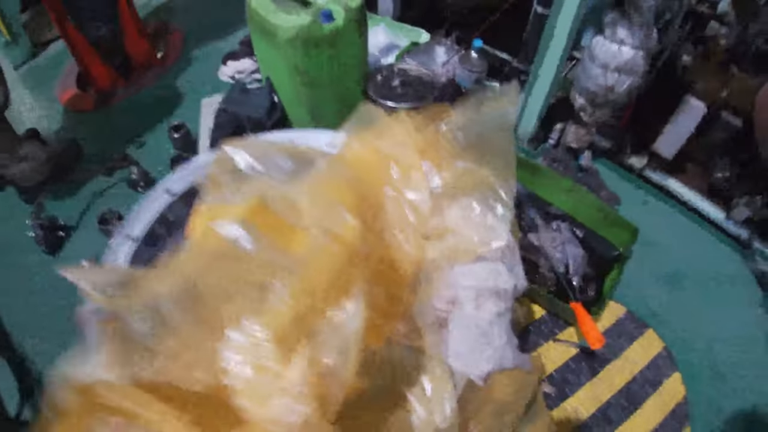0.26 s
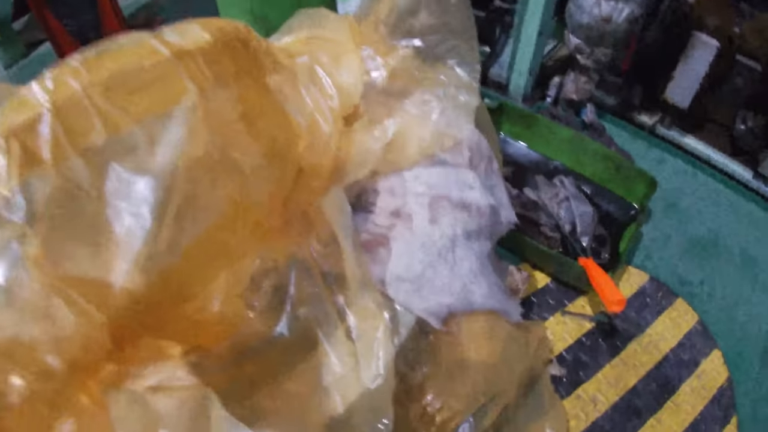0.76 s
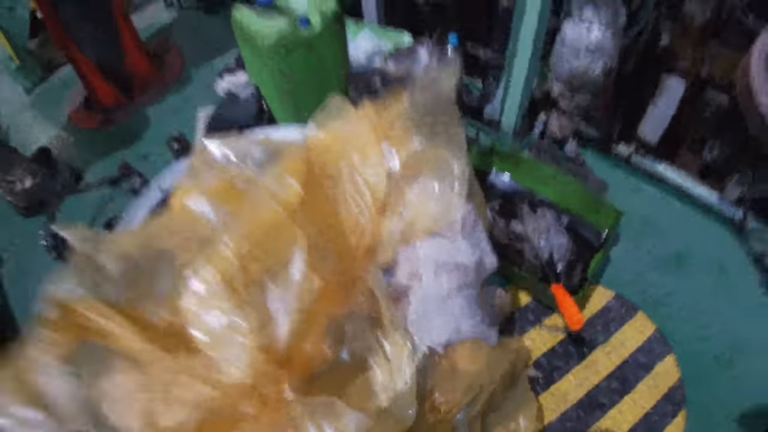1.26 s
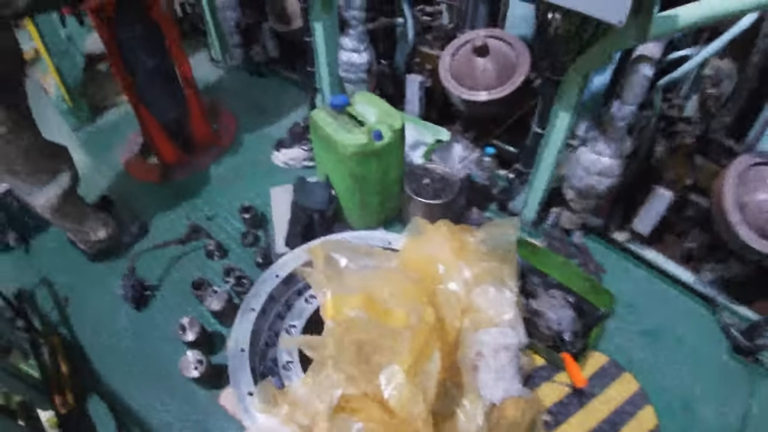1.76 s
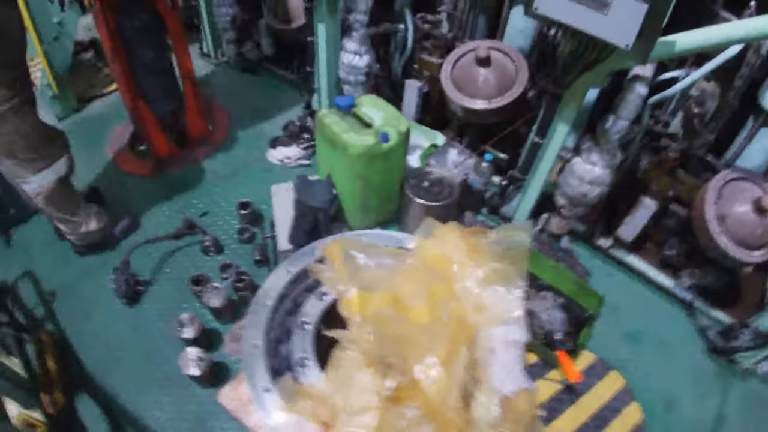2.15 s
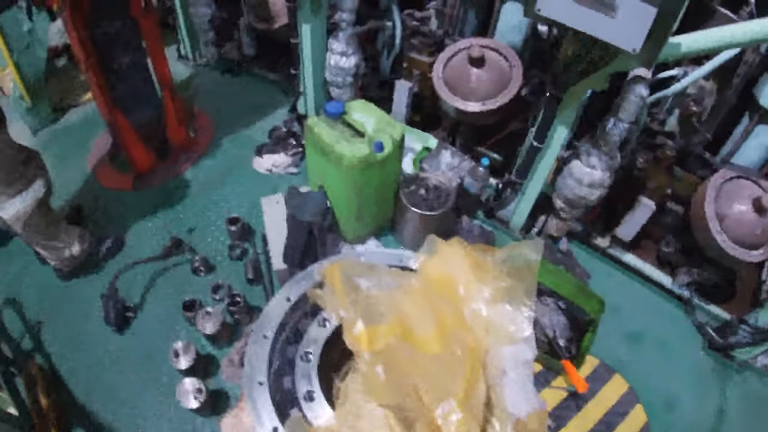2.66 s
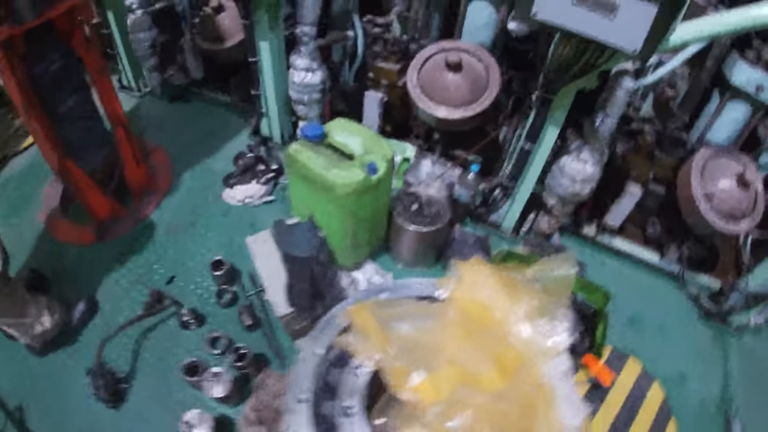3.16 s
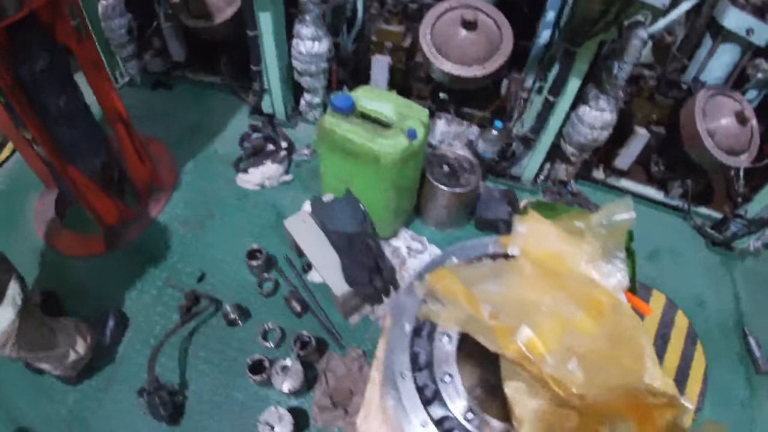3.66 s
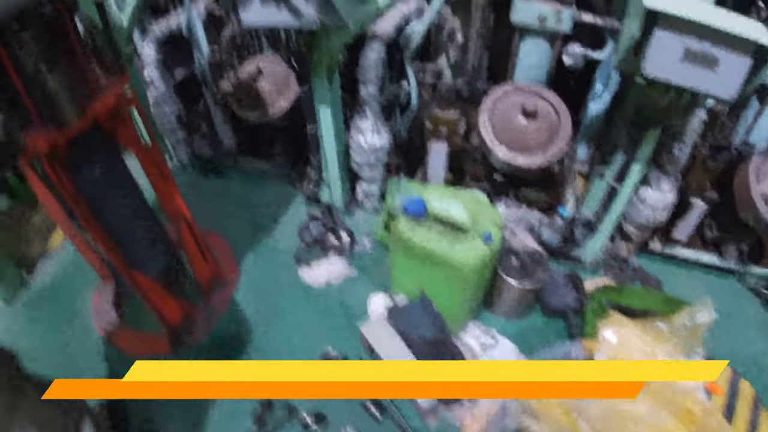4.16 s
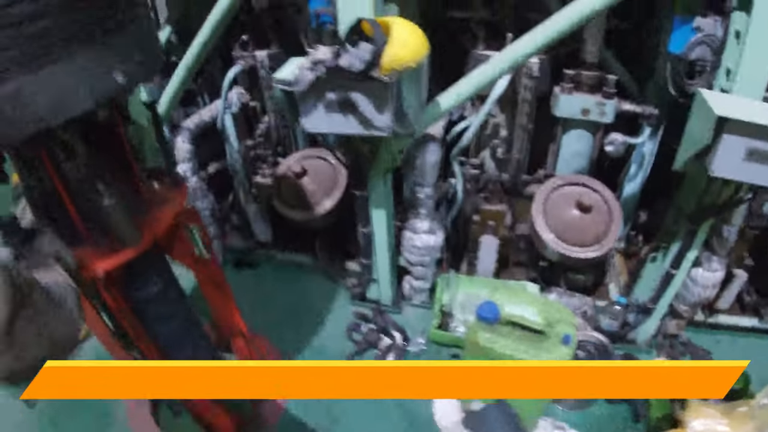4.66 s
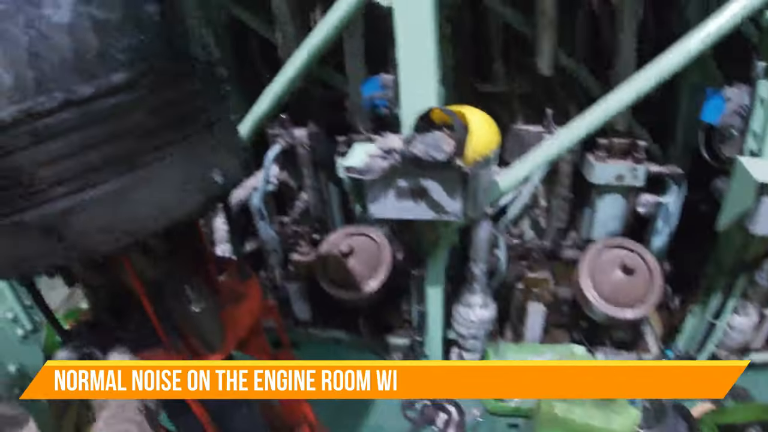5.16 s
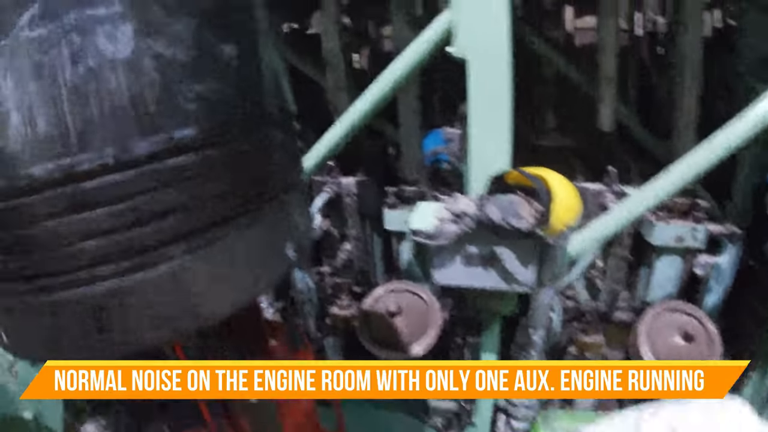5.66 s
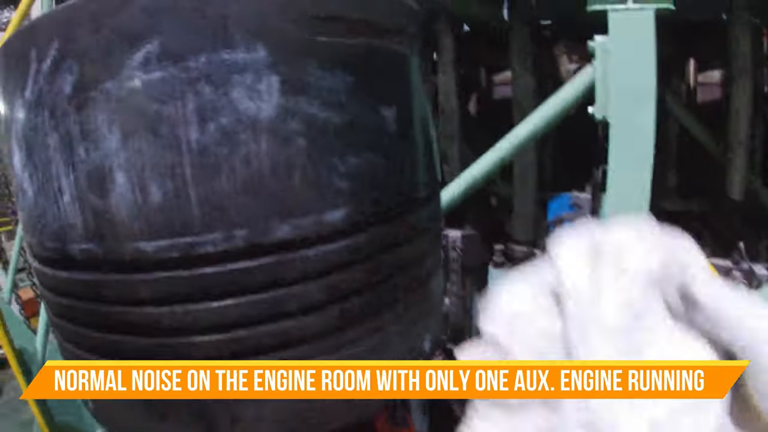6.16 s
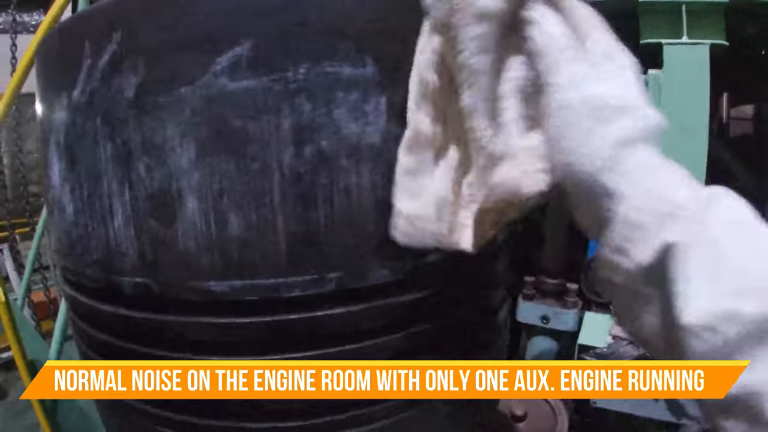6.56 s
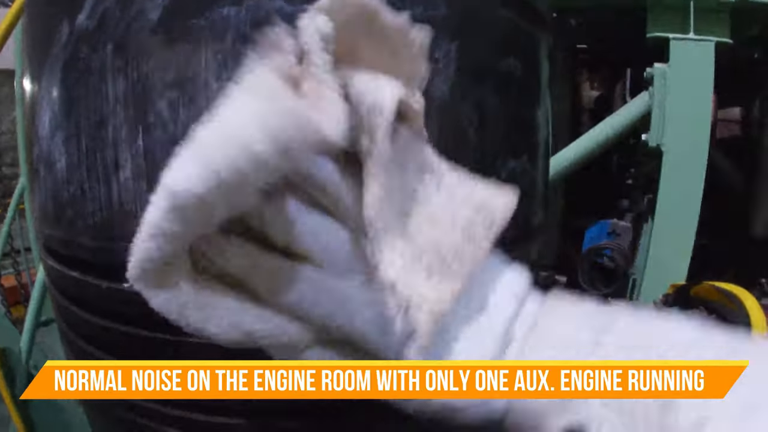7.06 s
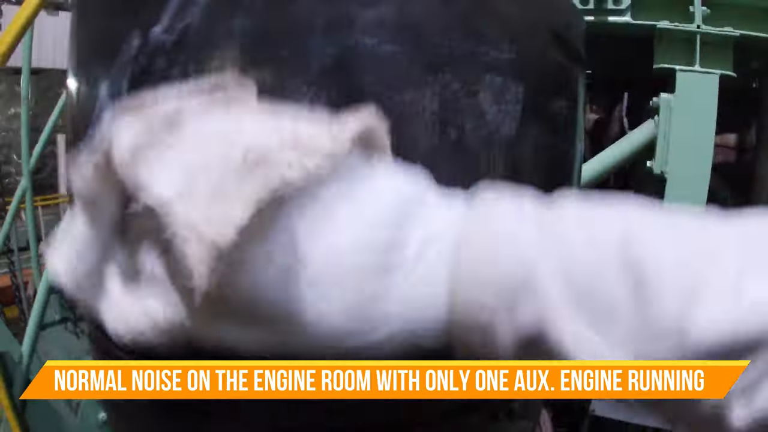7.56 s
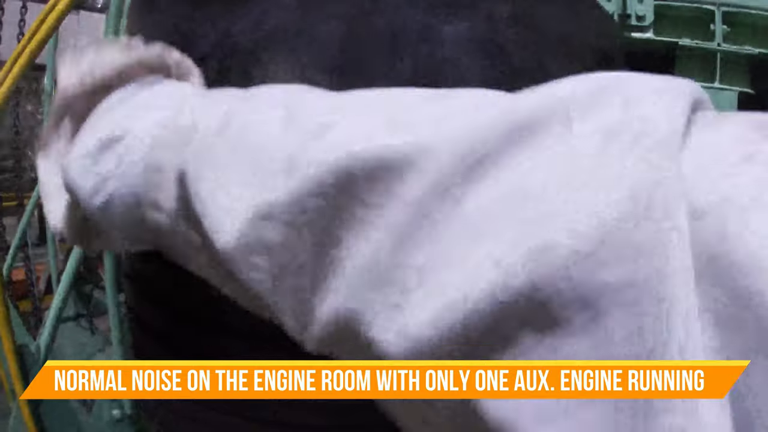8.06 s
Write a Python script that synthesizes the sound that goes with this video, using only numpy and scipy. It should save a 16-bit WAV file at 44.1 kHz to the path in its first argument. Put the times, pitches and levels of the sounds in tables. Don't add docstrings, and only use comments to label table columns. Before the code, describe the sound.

A running diesel generator drones deep and constant in a steel ship's engine room, with pump hum, faint high blower whine and broad ventilation roar.

```python
import sys
import numpy as np
from scipy import signal
from scipy.io import wavfile
from scipy.ndimage import uniform_filter1d

SR = 44100
rng = np.random.default_rng(int(sys.argv[2]) if len(sys.argv) > 2 else 0)


def gain_from_db(level_db):
    decades = np.asarray(level_db, float) / 20
    return 10 ** decades


def wav_record(signal):
    frames = np.transpose(np.atleast_2d(signal))
    bounded = np.clip(frames, -1, 1)
    quanta = np.round(bounded * 32767).astype(np.int16)
    wavfile.write(sys.argv[1], SR, quanta)


N = 366912

# t/s, place/1 (0 deck plates, 1 piston)
WALK = [
    (0, 0),
    (1.5, .05),
    (3, .2),
    (4.5, .35),
    (5.3, .85),
    (6.5, 1),
    (8.4, 1),
]
CYCLE_HZ = 7.4801


def engine(wander=.15, slow_per_s=.25, fast_per_s=.9):
    # f/Hz, rms level/dB each
    weak = [(20, -53.5), (80, -51), (150, -41.5), (230, -44), (300, -52), (450, -52), (600, -57.5),
            (800, -59.5), (1050, -60), (1400, -64), (1900, -77), (2300, -85)]
    # cycle order/1, level at deck plates/dB, level at piston/dB
    whole = [(6, -35, -41), (8, -47, -42), (10, -41, -48), (12, -40, -41), (14, -40, -43), (16, -48, -46),
             (20, -46, -46), (24, -39, -41), (26, -40, -36), (28, -40, -42), (30, -48, -51),
             (32, -31.5, -39), (34, -30.5, -39), (36, -48, -37), (42, -41, -41), (44, -46, -43),
             (46, -57, -55), (48, -47, -42), (50, -50, -46), (54, -47, -48), (68, -48, -49), (72, -49, -54),
             (76, -52, -51), (102, -55, -54), (124, -55, -58), (132, -56, -55)]
    # cycle order/1, level at deck plates/dB, level at piston/dB
    half = [(9, -38, -34), (15, -46, -40), (21, -39, -42), (23, -38, -42), (25, -37, -34), (27, -42, -38),
            (29, -45, -43), (31, -35, -45), (33, -50, -40), (35, -47, -44), (39, -42, -40), (47, -46, -45),
            (49, -45, -47), (51, -49, -43), (61, -56, -49), (65, -52, -49), (91, -55, -54)]
    t = np.arange(N // 8 + 1) * 8 / SR
    coarse_t = t[::16]
    turns = np.cumsum(cycle_hz(t)) * 8 / SR
    place = np.clip(columns(WALK, t)[0], 0, 1)
    strong = {round(k): (deck_db, piston_db) for k, deck_db, piston_db in whole + half}
    slow = fading(80, coarse_t, slow_per_s)
    fast = fading(220, coarse_t, fast_per_s)
    paths = np.vstack([slow, fast])
    start = np.exp(2j * np.pi * rng.random(300))
    out = np.zeros(len(t))
    cycle = np.exp(2j * np.pi * turns)
    spin = cycle * cycle
    for k in range(3, len(paths)):
        spin = spin * cycle
        path = paths[k]
        level_db = read(weak, k * CYCLE_HZ)
        if k in strong:
            deck_db, piston_db = strong[k]
            level_db = deck_db * (1 - place) + piston_db * place
            path = steadied(path, wander)
        path = path * gain_from_db(room_db(k * CYCLE_HZ, coarse_t)[0])
        path = np.interp(t, coarse_t, path)
        out += gain_from_db(level_db) * (path * start[k] * spin).real
    return np.sqrt(2) * signal.resample_poly(out, 8, 1)[:N]


def cycle_hz(t):
    slowest_s, recovery_hz_per_s2 = 4.65, .00046
    return CYCLE_HZ + recovery_hz_per_s2 * (t - slowest_s) ** 2


def pump(wander=1.0, per_s=1.7):
    # shaft order/1, rms level/dB
    orders = [(19, -56), (30, -54), (31, -58), (40, -55), (41, -63), (50, -67), (60, -67), (69, -66),
              (70, -69), (71, -69), (80, -66), (90, -70), (100, -72), (110, -71), (120, -79), (140, -80)]
    # t/s, length/s, tooth 2nd harmonic/dB, gear order 29/dB
    loud_spots = [
        (0.745, 0.66, 6.5, 13.5),
        (2.218, 1, 13.5, 13),
        (3.252, .5, 12.5, 14),
        (3.9, .3, 3.5, 13),
        (4.3, .4, 6, 1),
        (5, .3, 9.5, -2),
        (6, .7, 3.5, 12.5),
    ]
    shaft_hz = 35.092
    usual_db = [[-52.5], [-58]]
    t = np.arange(N) / SR
    coarse_t = t[::64]
    paths = fading(len(orders), coarse_t, per_s)
    out = np.zeros(N)
    for k, level_db in zip((20, 29), spots(loud_spots, t) + usual_db):
        out += gain_from_db(level_db) * np.cos(2 * np.pi * k * shaft_hz * t)
    for (k, level_db), path in zip(orders, paths):
        path = steadied(path, wander)
        gain = np.interp(t, coarse_t, abs(path))
        slip = np.interp(t, coarse_t, np.unwrap(np.angle(path)))
        out += gain_from_db(level_db) * gain * np.cos(2 * np.pi * k * shaft_hz * t + slip)
    return np.sqrt(2) * out


def blowers():
    # t/s, rising f/Hz, falling f/Hz
    blades = [
        (0, 4612, 4753),
        (1.56, 4612, 4756),
        (2.3, 4613, 4752.5),
        (3.64, 4637, 4738),
        (4.68, 4650.5, 4723.5),
        (6.76, 4664, 4707.5),
        (7.28, 4668.5, 4704.5),
        (8.32, 4679.5, 4686),
    ]
    # 1st harmonic/dB, 2nd harmonic/dB
    rising_ends = [(-66.5, -74.5), (-61, -73)]
    # 1st harmonic/dB, 2nd harmonic/dB
    falling_ends = [(-70.5, -74), (-68.5, -74)]
    # t/s, length/s, 1st harmonic/dB, 2nd harmonic/dB
    rising_glints = [(1.15, .6, -5, 2), (1.653, .3, 5, 1), (2.45, .3, 2, -8), (2.75, .2, 1, 8),
                     (3.45, .2, -6, -2), (3.798, 0.18, 7, -2), (4.44, 0.85, 3.5, 4), (5.8, 0.46, 3, -1),
                     (6.4, 0.17, 0, -4), (6.78, .3, -4, 2), (7.602, .3, 2.5, 2), (7.903, 0.16, -10, -4),
                     (8.25, 0.33, 0, 6)]
    # t/s, length/s, 1st harmonic/dB, 2nd harmonic/dB
    falling_glints = [(.7, .5, -6, -2), (1.1, .2, 4, 7), (2.38, .2, 4, -11), (2.8, .5, -10, -4),
                      (3.2, .3, 7, 0), (3.85, .3, 4, 0), (4.5, .4, 1, -8), (5.7, 0.28, -8, -5),
                      (6.1, .4, 6, -1), (6.7, .3, -7, 1), (6.95, 0.22, 6, -13), (7.22, 0.27, 3, 7),
                      (7.45, 0.13, 3, -11), (7.75, .3, -2, 4), (7.98, 0.12, 2, -8)]
    rising_hz, falling_hz = columns(blades, np.arange(N) / SR)
    rising = blower(rising_hz, rising_ends, rising_glints, third_db=-99)
    return rising + blower(falling_hz, falling_ends, falling_glints, third_db=-101)


def blower(hz, ends, glints, third_db, tremble_hz=2, flicker_db=2.5, scatter=.65, scatter_s=.022):
    t = np.arange(N) / SR
    coarse_t = t[::64]
    tremble = np.interp(t, coarse_t, fading(1, coarse_t, 3.5)[0].real)
    turns = np.exp(2j * np.pi * np.cumsum(hz + tremble_hz * tremble) / SR)
    place = columns(WALK, t)[0]
    walk_db = np.outer(ends[0], 1 - place) + np.outer(ends[1], place)
    first_db, second_db = walk_db + spots(glints, t)

    steps = np.clip(rng.standard_normal((2, N // 2048 + 1)), -2, 1)
    steps = np.repeat(steps, 2048, 1)[:, :N]
    flicker = gain_from_db(flicker_db * uniform_filter1d(steps, size=500))

    knots = np.arange(0, t[-1] + 1, scatter_s)
    draws = rng.standard_normal((2, 2, len(knots)))
    first, second = [1 + share * np.interp(t, knots, a + 1j * b)
                     for share, (a, b) in zip((.7 * scatter, scatter), draws)]
    tones = gain_from_db(first_db) * flicker[0] ** .3 * first * turns
    tones += gain_from_db(second_db) * flicker[1] * second * turns ** 2
    tones += gain_from_db(third_db) * flicker[1] * second * turns ** 3
    return tones.real


def roar(patchy_db=1.02, throb=0.037):
    # f/Hz, density/dB per Hz
    density = [(12, -70), (26, -60), (90, -49.5), (180, -50.5), (260, -51.5), (400, -59), (800, -71.5),
               (1100, -72), (1900, -77), (3200, -81), (4300, -89), (5600, -89), (6700, -106), (9600, -109)]
    # f/Hz, level/dB
    top_air = [(9600, -0.5), (10800, -9), (12200, -6), (14500, -7.5), (15700, -20.5)]
    # t/s, length/s, middle/dB, treble/dB, top air/dB
    facing = [
        (2.7, 1.8, 3, 0.5, 0),
        (5.5, 2.9, -1, 1.4, -1.5),
        (7.3, 0.99, -2.5, -1, -3.5),
        (8.1, 1.2, -2, -1, -6.5),
    ]
    frames, hz = N // 1024 + 5, np.fft.rfftfreq(4096, 1 / SR)
    t = np.arange(frames) * 1024 / SR
    a, b, patches = rng.standard_normal((frames, len(hz), 3)).T
    patches = uniform_filter1d(uniform_filter1d(patches, size=20, axis=0), size=12, axis=1)
    band = np.interp(np.log(hz + 1), np.log([300, 700, 2500, 9800, 12000]), [-1, 0, 1, 1, 2])
    share = np.clip(1 - abs(band[:, None] - np.arange(3)), 0, 1)
    field_db = (read(density, hz) + read(top_air, hz))[:, None]
    field_db = field_db + share @ spots(facing, t)
    field_db += patchy_db * patches / patches.std()
    field_db += room_db(hz, t)
    spectrum = (a + 1j * b) * gain_from_db(field_db)
    noise = signal.istft(spectrum, SR, nperseg=4096, noverlap=3072, scaling="psd")[1][:N]
    crank = 4 * np.pi * np.cumsum(cycle_hz(np.arange(N) / SR)) / SR
    return gain_from_db(-0.24) * noise * (1 + throb * np.cos(crank))


def room_db(hz, t):
    # f/Hz, width/Hz, level/dB
    casings = [(26, 10, 1.5), (523.5, 23, 2.5), (716, 27, 2), (760, 43, 2), (1060, 58, 3), (1418, 33, 3.5),
               (1757, 140, 3), (2420, 130, 3.5), (2714, 130, 3), (9200, 1200, 4.5)]
    # t/s, length/s, strongest hum/dB, pocket above it/dB, upper pocket/dB
    nodes = [
        (0, 0.64, -0.5, 4, -1),
        (.75, 0.51, -4, -5.5, -2.5),
        (1.5, .6, -3, 1, 0.5),
        (1.9, .8, 1.5, 2, 0),
        (2.85, 1, -1.5, -5, 2),
        (4.2, 0.58, 0, 3.5, -0.5),
        (5.1, 0.36, 3, -0.5, 0.5),
        (5.6, 1.3, -8, 3.5, 2),
        (6.7, 0.54, -0.5, 1.5, -3),
        (7.5, 2.1, 3, -4, -2),
    ]
    hz = np.reshape(hz, (-1, 1))
    colour_db = sum(db * bump(hz, f, width) for f, width, db in casings)
    bent_s, bent_db = 1.6, -10
    bent = bump(np.maximum(t, bent_s / 2), bent_s / 2, bent_s)
    colour_db = colour_db + bump(hz, 194, 26) * bent_db * bent
    for (f, width), db in zip(((277, 91), (388, 80), (666, 260)), spots(nodes, t)):
        colour_db = colour_db + bump(hz, f, width) * db
    return colour_db


def fading(count, t, per_s):
    knots = np.arange(-1, t[-1] * 8 + 2)
    z = rng.standard_normal((count, 600)) + 1j * rng.standard_normal((count, 600))
    z = np.fft.ifft(z * np.exp(-(np.fft.fftfreq(600, 1 / 8) / per_s) ** 2))
    z = z[:, :len(knots)]
    z = z / rms_rows(z)
    return np.array([np.interp(t * 8, knots, row) for row in z])


def rms_rows(z):
    return np.sqrt(np.mean(abs(z) ** 2, 1, keepdims=True))


def steadied(path, wander):
    return (1 + wander * path) / np.hypot(1, wander)


def columns(rows, t):
    s, *values = np.transpose(rows)
    return [np.interp(t, s, v) for v in values]


def read(points, hz):
    f, value = np.transpose(points)
    return np.interp(np.log(hz + 1), np.log(f + 1), value)


def bump(x, centre, width):
    return np.exp(-((x - centre) / width * 2) ** 2)


def spots(rows, t):
    return sum(np.outer(db, bump(t, s, length)) for s, length, *db in rows)


def scene():
    return (engine() + pump() + blowers() + roar())[None]


def top_dropouts(x, masking=.2):
    # low/Hz, high/Hz, share of frames lost/1
    bands = ((10000, 10400, .13), (10400, 10900, .22), (10900, 11300, .2),
             (14700, 15100, .3), (15100, 16000, .75))
    hz, t, z = signal.stft(x, SR, nperseg=1024)
    luck = uniform_filter1d(rng.standard_normal((len(bands), len(t))), size=4)
    blade = (hz > 9200) & (hz < 9550)
    tone_db = 20 * np.log10(abs(z[0, blade]).max(0) + 1e-9)
    luck -= .2 * np.clip(t - 6, 0, 1.5)
    luck -= masking * uniform_filter1d(tone_db, size=6)
    for (low, high, share), row in zip(bands, luck):
        z[:, (hz >= low) & (hz < high)] *= row > np.quantile(row, share)
    return signal.istft(z, SR, nperseg=1024)[1][:, :N]


def band_limit(x):
    return signal.sosfilt(signal.butter(12, 15460, fs=SR, output="sos"), x)


def record(dry, trim_db=0.85):
    ceiling, squeeze = .33, .24
    low = signal.sosfiltfilt(signal.butter(2, 700, fs=SR, output="sos"), dry)
    power = uniform_filter1d(uniform_filter1d(low ** 2, size=600), size=600)
    evened = low * (power / power.mean()) ** (-squeeze / 2)
    rounded = ceiling * np.tanh(gain_from_db(trim_db) * evened / ceiling)
    rounded = signal.sosfiltfilt(signal.butter(4, 1500, fs=SR, output="sos"), rounded)
    mix = top_dropouts(rounded + dry - low)
    return band_limit(mix)


dry = scene()
out = record(dry)
wav_record(out)
```